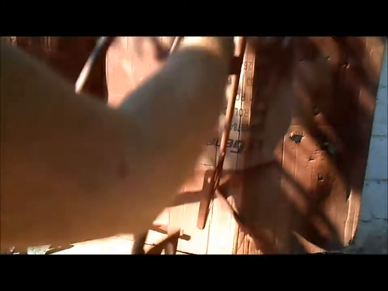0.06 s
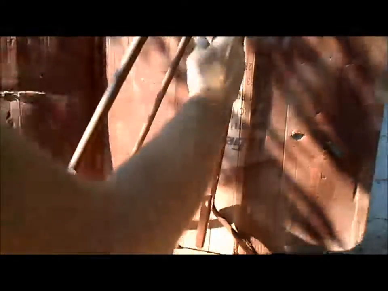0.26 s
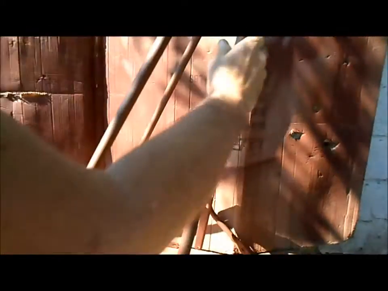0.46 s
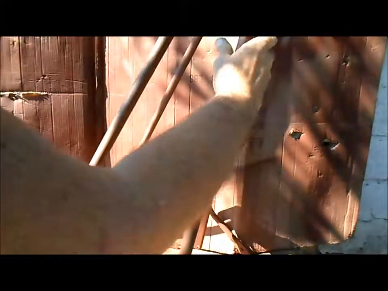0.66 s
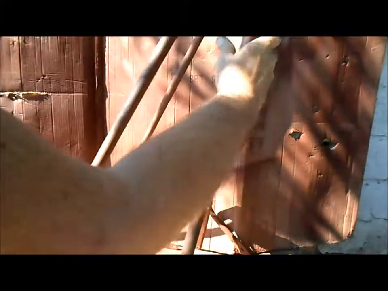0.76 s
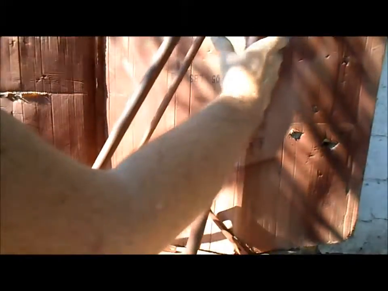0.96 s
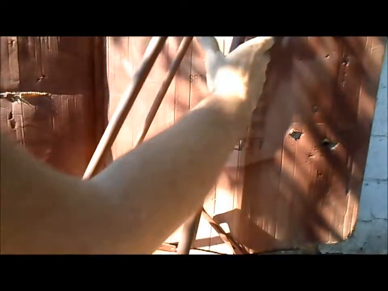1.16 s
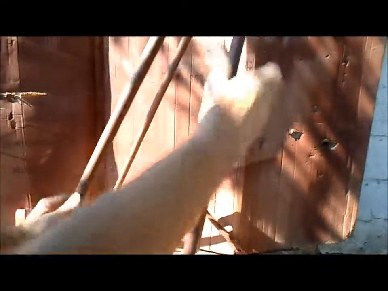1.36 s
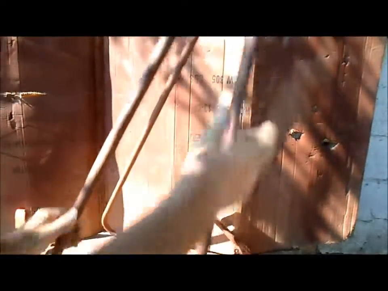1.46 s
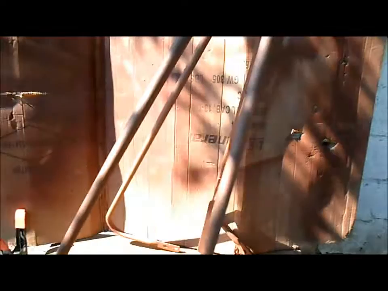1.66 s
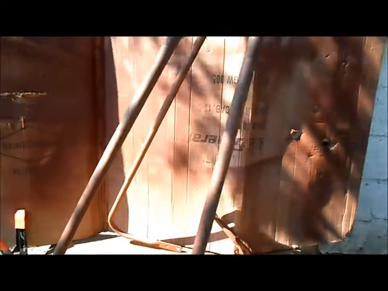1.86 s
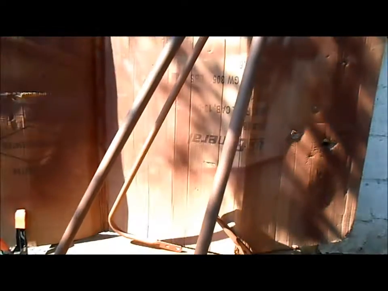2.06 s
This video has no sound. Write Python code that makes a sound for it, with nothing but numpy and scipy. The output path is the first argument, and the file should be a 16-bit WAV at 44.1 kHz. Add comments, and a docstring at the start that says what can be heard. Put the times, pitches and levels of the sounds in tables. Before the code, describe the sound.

A metal tube frame scrapes along wood from the start, knocking once at 0.2 seconds. Between 0.35 and 0.5 seconds it lands with a heavy double thump, the panel booming, boards rattling and tubes clicking and faintly ringing. Quiet glove rubs and soft knocks follow until about 2 seconds, with tiny faint squeals near 0.7 and 1.9. Light outdoor wind and a distant hum lie underneath.

```python
"""Outdoors, a metal tube frame slides along a wooden panel and is set down with a heavy double thump.
Each hit makes the panel boom and the boards rattle, while the steel tubes ring faintly and click.
Sliding is thousands of tiny slips: the tubes hiss on the wood and the dragged feet grumble.
Soft knocks, glove rubs and two brief squeals follow as the hand lets go.
Light wind and a distant hum lie underneath."""
import sys
import numpy as np
from scipy import signal
from scipy.fft import rfft, irfft
from scipy.io import wavfile

SR = 44100
rng = np.random.default_rng(int(sys.argv[2]) if len(sys.argv) > 2 else 0)


def put_to_file(sound):
    """Save the sound as 16-bit audio at rate SR, in the file named by the first command-line argument."""
    columns = np.atleast_2d(sound).T  # one column per channel
    safe = np.clip(columns, -1, 1)
    whole_steps = np.round(safe * 32767)
    wavfile.write(sys.argv[1], SR, whole_steps.astype(np.int16))


N = 92610
TIME = np.arange(N) / SR
CUTOFF_HZ = 10300


def from_db(db):
    """Turn decibels into a number to multiply a sound by."""
    return 10 ** (np.asarray(db) / 20)


def rms_one(sound):
    """Scale a sound so that its average strength (rms) is 1."""
    return sound / np.sqrt(np.mean(sound ** 2) + 1e-20)


def at_hz(table, hz):
    """Look up a value at any pitch, blending between the rows of a table."""
    pitches, values = np.transpose(table)
    return np.interp(np.log(hz), np.log(pitches), values)


def filt(sound, hz, kind, order=2):
    """Keep the low part, the high part or one band of a sound."""
    return signal.sosfilt(signal.butter(order, hz, kind, fs=SR, output="sos"), sound + 1e-18)


def drift(steps_per_s):
    """A smooth random wander, mostly between -1 and 1."""
    return np.interp(TIME * steps_per_s, np.arange(400), rng.standard_normal(400))


def noise_bands(spectrum):
    """Shape noise and split it into half-octave bands; return their middle pitches and sounds."""
    edges = 18 * 2 ** (np.arange(20) / 2)
    centres = np.sqrt(edges[1:] * edges[:-1])
    hz = np.maximum(np.fft.rfftfreq(N, 1 / SR), 1)
    shaped = rfft(rng.standard_normal(N)) * from_db(at_hz(spectrum, hz))
    in_band = (hz >= edges[:-1, None]) & (hz < edges[1:, None])
    bands = irfft(shaped * in_band, N)
    return centres, bands / bands.sum(0).std()


def add(out, start_s, sound):
    """Mix a sound into out at the given time."""
    i = int(start_s * SR)
    out[i:i + len(sound)] += sound[:N - i]


def outdoors():
    """Wind rumble and distant hum flicker in level under two faint, wavering high tones."""
    # Tone colour of the wind and hum: pitch_hz, relative_db
    air_colour = [(20, -2), (42, 1), (80, -4), (120, -8.5), (160, -20), (250, -15), (330, -23), (500, -28),
                  (800, -25), (1400, -28.5), (2200, -36.5), (4200, -45), (6500, -48), (8200, -48),
                  (10500, -46.5)]
    # The high tones: pitch_hz, level_db
    whines = [(3950, -75.5), (7900, -74.5)]
    air_db, flicker_db, pitch_waver = -43.5, 1.82, 0.00696
    _, bands = noise_bands(air_colour)
    air = sum(band * from_db(flicker_db * drift(17)) for band in bands)
    tones = np.zeros(N)
    for pitch_hz, level_db in whines:
        wavering_hz = pitch_hz * (1 + pitch_waver * drift(170))
        tones += from_db(level_db) * np.sin(2 * np.pi * np.cumsum(wavering_hz) / SR)
    return from_db(air_db) * air + tones


def strokes(rows, rise_s=0.00067, fade_s=0.015):
    """Loudness of rubbing strokes: each starts fast, moves between two levels, then dies away."""
    loudness = np.zeros(N)
    for start_s, end_s, start_db, end_db in rows:
        level = from_db(np.interp(TIME, [start_s, end_s], [start_db, end_db]))
        rise = np.clip((TIME - start_s) / rise_s, 0, 1)
        fade = np.exp(-np.maximum(TIME - end_s, 0) / fade_s)
        loudness += level * rise * fade
    return loudness


def squeals():
    """A slipping tube squeals for a moment as the rubbing stirs a narrow band of pitches."""
    # The squeals: start_s, end_s, pitch_hz, width_hz, level_db
    slips = [(0.705, 0.792, 8100, 885, -68), (1.866, 1.886, 1036, 86, -54)]
    out = np.zeros(N)
    for start_s, end_s, pitch_hz, width_hz, level_db in slips:
        band_hz = (pitch_hz - width_hz / 2, pitch_hz + width_hz / 2)
        squeal = rms_one(filt(rng.standard_normal(N), band_hz, "band"))
        out += strokes([(start_s, end_s, level_db, level_db)]) * squeal
    return out


def friction(spectrum, slips_per_s=6000, spread_db=1.5):
    """Rubbing is a stream of tiny random slips, coloured by the surface they shake."""
    slips = (rng.random(N) < slips_per_s / SR) * rng.choice([-1, 1], N)
    strength = from_db(spread_db * np.minimum(rng.exponential(1, N), 5))
    hz = np.maximum(np.fft.rfftfreq(N, 1 / SR), 1)
    rubbing = irfft(rfft(slips * strength) * from_db(at_hz(spectrum, hz)), N)
    return rms_one(filt(filt(rubbing, 84, "high"), CUTOFF_HZ, "low"))


def scraping():
    """Sliding tubes and a rubbing glove hiss; the frame's dragged feet grumble lower down."""
    # Tubes on wood, glove on tubes: start_s, end_s, start_db, end_db
    slides = [(0.205, 0.300, -45, -45.5), (0.300, 0.352, -47.5, -41), (0.365, 0.415, -65, -55.5),
              (0.438, 0.444, -42, -48.5), (0.445, 0.520, -67, -54.5), (0.537, 0.553, -41.5, -56.5),
              (0.555, 0.585, -53.5, -63), (0.695, 0.800, -61.5, -78), (0.935, 0.980, -67, -62.5),
              (1.185, 1.265, -68, -69), (1.290, 1.340, -64, -59), (1.642, 1.720, -62.5, -67),
              (1.765, 2.100, -62.5, -66)]
    # Tone colour of their hiss: pitch_hz, relative_db
    hiss_colour = [(1000, 0), (2500, -5), (4500, -4), (5800, -1.5), (7300, -1), (8800, 3), (10500, 3.5)]
    # Feet dragging: start_s, end_s, start_db, end_db
    drags = [(0.0, 0.20, -41.5, -41), (0.20, 0.35, -39.5, -41.5), (1.862, 1.895, -53, -44.5)]
    # Tone colour of their grumble: pitch_hz, relative_db
    grumble_colour = [(70, 14.5), (120, -0.5), (230, 1), (450, -9), (680, -5), (820, -10), (1050, -3.5),
                      (1500, -14.5), (2500, -23), (5000, -31), (10000, -31)]
    return strokes(slides) * friction(hiss_colour) + strokes(drags) * friction(grumble_colour)


def metal_clicks():
    """Metal taps metal with a sharp click, and loose parts chatter briefly after it."""
    # The taps: start_s, click_db, top_hz, chatter_db
    taps = [(0.2050, -47, 10000, -46), (0.3511, -19, 9100, -27), (0.3590, -20, 8900, -36),
            (0.3708, -25.5, 8000, -54), (0.386, -33, 8000, -51), (0.3946, -34, 7000, -50),
            (0.432, -23, 5040, -25), (0.4735, -37, 3200, -31), (0.4795, -30, 3200, -42),
            (1.2813, -46, 10100, -59), (1.2896, -40, 10100, -57), (1.3169, -36, 10200, -57),
            (1.321, -53, 10000, -62), (1.644, -45.5, 10000, -55), (1.7730, -50, 5000, -46.5)]
    click_low_hz, click_fade_s = 3200, 0.00085
    chatter_band_hz, chatter_fade_s = (2500, 3710), 0.019
    out, t = np.zeros(N), TIME[:SR // 10]
    for start_s, click_db, top_hz, chatter_db in taps:
        click = rng.standard_normal(len(t)) * np.exp(-t / click_fade_s)
        click = filt(filt(click, click_low_hz, "high"), top_hz, "low")
        chatter = rng.standard_normal(len(t)) * np.exp(-t / chatter_fade_s)
        chatter = filt(chatter, chatter_band_hz, "band")
        add(out, start_s, from_db(click_db) * click + from_db(chatter_db) * chatter)
    return out


def ring(notes, t):
    """A struck object rings with several pure notes; each falls 60 dB in its ring_s seconds."""
    pitch_hz, level_db, ring_s = np.transpose(notes)[:, :, None]
    return from_db(level_db - 60 * t / ring_s) * np.sin(2 * np.pi * pitch_hz * t)


def frame_hits():
    """Each hit rings panel and tubes and rattles the boards; soft ones are dull, light ones thin."""
    # The frame strikes the panel: start_s, ring_db, bass_cut_hz, treble_cut_hz, rattle_db
    hits = [(0.2042, -13, 132, 208, -30.5), (0.3511, -9.5, 169, 890, -27.5),
            (0.3588, -12.5, 89.7, 2180, -12.5), (0.3834, -12, 60, 303, -18), (0.4, -15.5, 80, 224, -16.5),
            (0.4156, -44, 80, 1680, -25.5), (0.4305, -22, 90.5, 404, -33), (0.443, -8, 40, 192, -17),
            (0.4566, -29, 40, 280, -19), (0.4727, -30, 39.5, 656, -21.5), (0.4804, -41, 40.2, 277, -29.5),
            (0.496, -9.5, 50.3, 89, -26), (0.616, -44.5, 249, 326, -35.5), (1.040, -43.5, 200, 353, -37),
            (1.284, -40, 220, 325, -31), (1.637, -34, 110, 278, -28.5), (1.692, -29.5, 99, 178, -27.5),
            (1.744, -30, 70, 121, -32.5), (1.772, -51, 150, 1800, -49.5), (1.9084, -32, 234, 490, -34.5)]
    # Notes of the wooden panel: pitch_hz, relative_db, ring_s
    panel_notes = [(95, -18.5, 0.27), (129.7, -27, 0.59), (173.4, -18.5, 0.2), (214.3, -13.5, 0.16),
                   (286, -7, 0.037), (297.9, -16.5, .25), (388, -18, 0.04), (549.5, 3.5, 0.032),
                   (611, -11, 0.037), (689, -18.5, 0.17), (767.4, -16.5, 0.11), (886, -10, 0.042),
                   (1020, -28, .09)]
    # Notes of the steel tubes: pitch_hz, relative_db, ring_s
    tube_notes = [(935, -24.5, .2), (1416, -16.5, 0.1), (1798, -16.5, 0.12), (2200, -31, 0.1),
                  (2578, -12, 0.072), (2924, -22.5, .22), (3282, -26.5, .16), (3916, -19.5, 0.1)]
    # Tone colour of boards and frame rattling together: pitch_hz, relative_db
    rattle_colour = [(40, 1), (90, -3.5), (180, 1), (350, 4.5), (600, 0.5), (1200, -4.5), (2000, -11),
                     (3000, -16.5), (5000, -11.5), (10000, -16)]
    # How long that rattle takes to fall 60 dB: pitch_hz, ring_s
    rattle_times = [(60, 0.51), (250, 0.093), (700, 0.099), (2000, 0.093), (5000, 0.053), (10000, 0.035)]
    note_scatter_db, rattle_rise_s = 3, 0.00094
    yard_echo_db, yard_echo_s = -13.5, 0.45
    size = SR // 2
    out, t = np.zeros(N), TIME[:size]
    centres, bands = noise_bands(rattle_colour)
    rattle_fade = from_db(-60 * t / at_hz(rattle_times, centres)[:, None])
    echo_fade = from_db(yard_echo_db - 60 * t / yard_echo_s)
    rattle_shape = (rattle_fade + echo_fade) * (1 - np.exp(-t / rattle_rise_s))
    notes = np.vstack([ring(panel_notes, t), -ring(tube_notes, t)])
    for start_s, ring_db, bass_cut_hz, treble_cut_hz, rattle_db in hits:
        offset = int(rng.random() * (N - size))  # each hit gets its own stretch of noise
        ringing = from_db(ring_db + note_scatter_db * rng.standard_normal(len(notes))) @ notes
        rattle = from_db(rattle_db) * (bands[:, offset:offset + size] * rattle_shape).sum(0)
        thump = filt(ringing + rattle, treble_cut_hz, "low")
        add(out, start_s, filt(thump, bass_cut_hz, "high", order=1))
    return out


def scene():
    """Add all the sounds together in one channel."""
    return (frame_hits() + metal_clicks() + scraping() + squeals() + outdoors())[None]


def record(dry):
    """Round off the loudest peaks, then steeply cut the highest treble."""
    treble_cut = signal.ellip(10, .3, 70, CUTOFF_HZ, fs=SR, output="sos")
    return signal.sosfilt(treble_cut, np.tanh(dry))


dry = scene()
out = record(dry)
put_to_file(out)
```